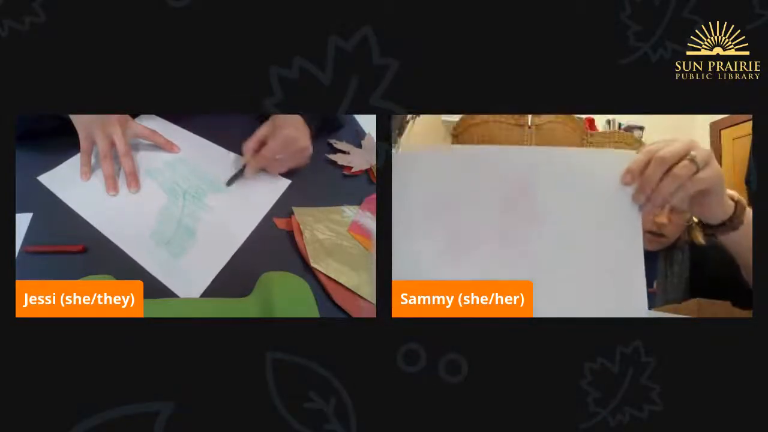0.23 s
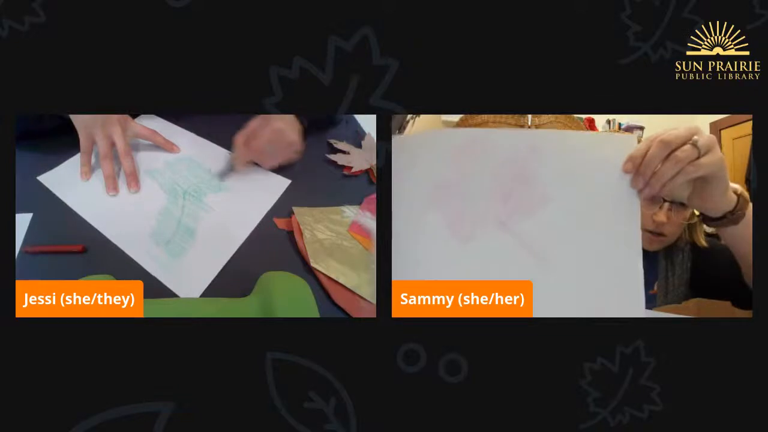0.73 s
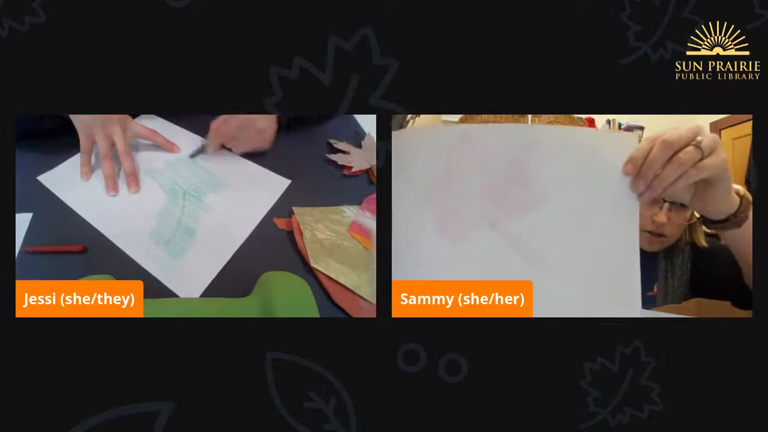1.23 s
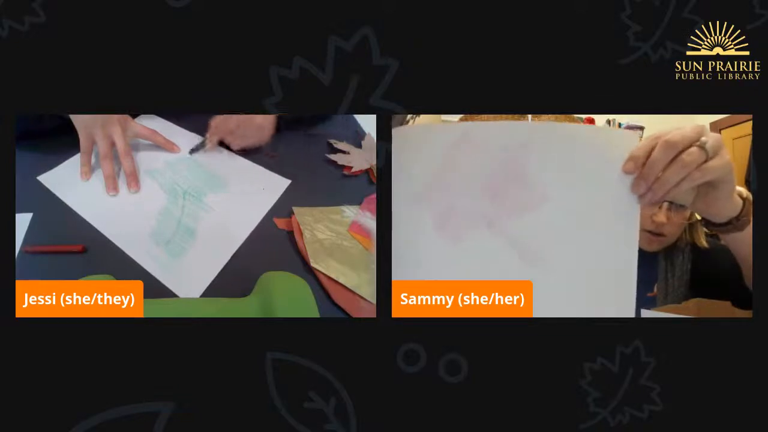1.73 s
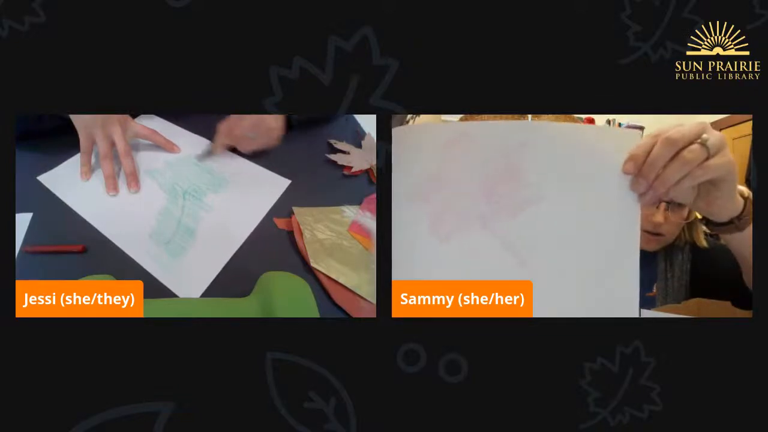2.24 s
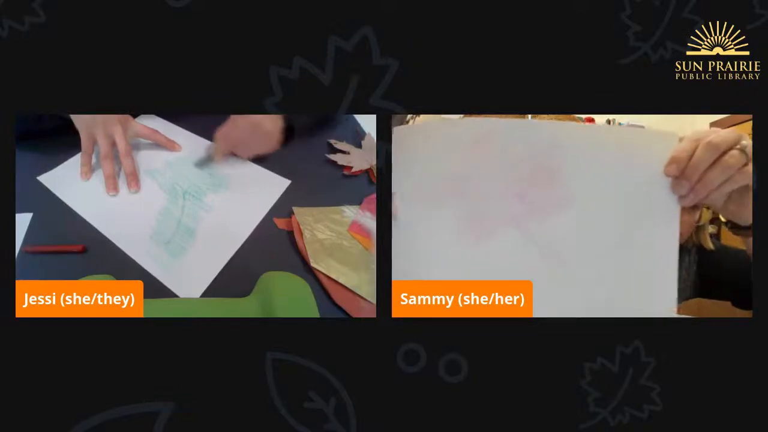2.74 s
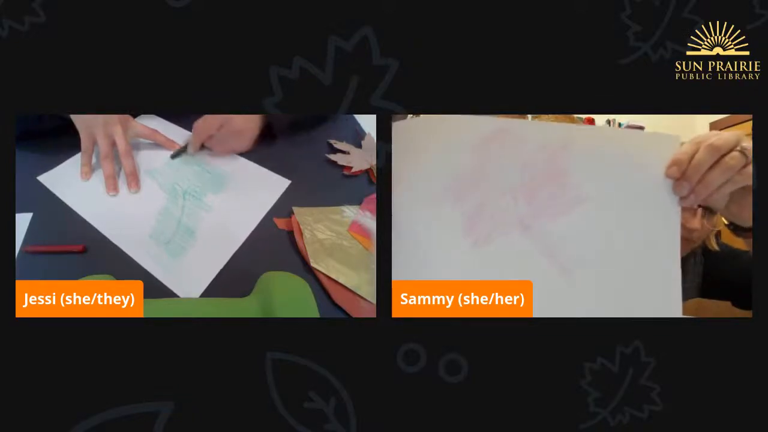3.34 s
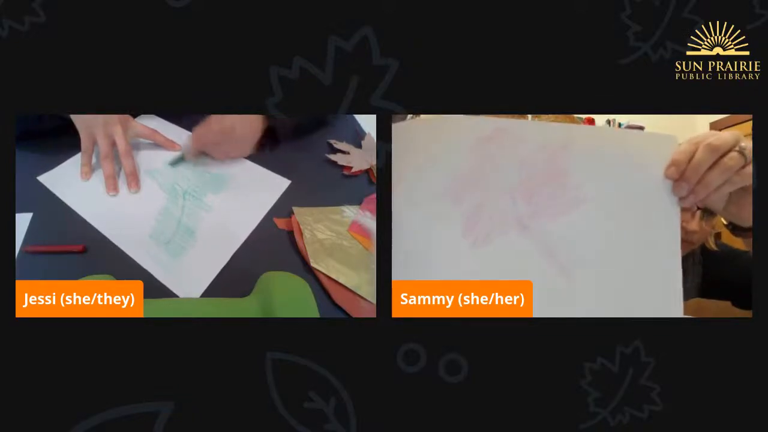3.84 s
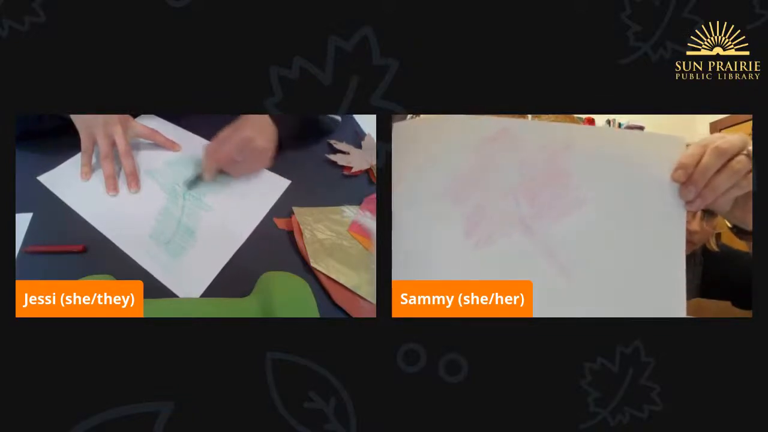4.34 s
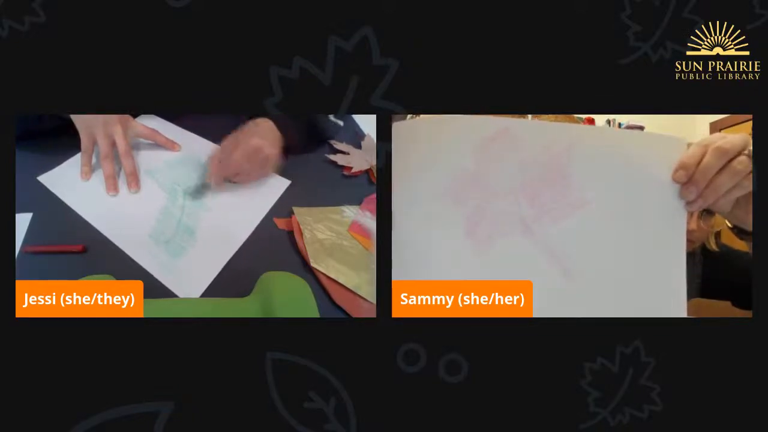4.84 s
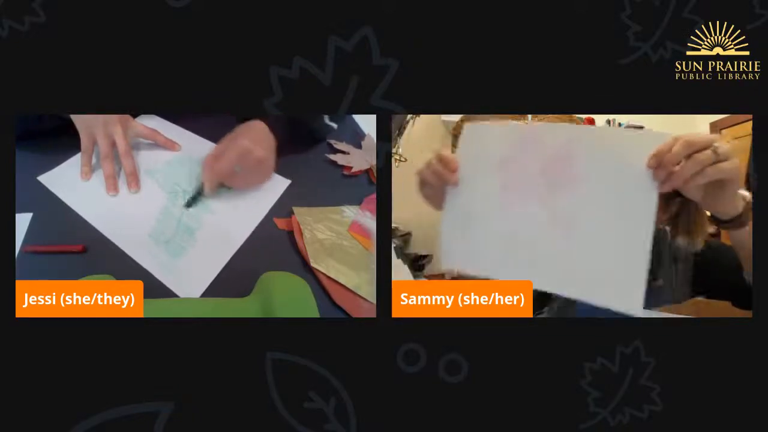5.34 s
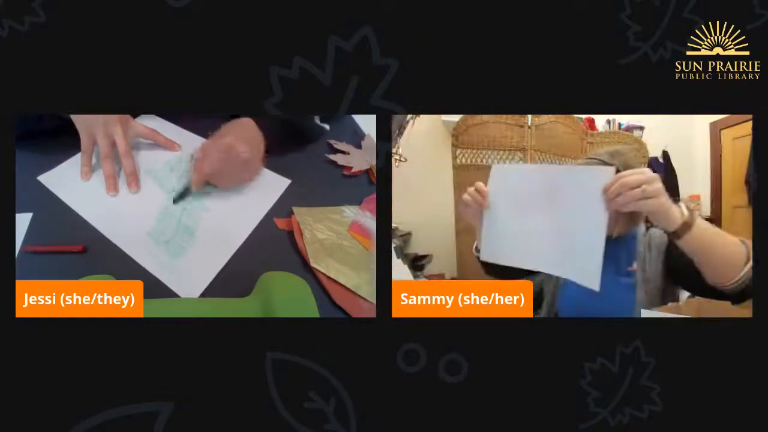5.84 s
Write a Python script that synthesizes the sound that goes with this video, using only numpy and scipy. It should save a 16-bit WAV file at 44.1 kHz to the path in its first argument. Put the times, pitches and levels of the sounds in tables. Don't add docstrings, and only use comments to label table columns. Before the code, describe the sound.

A crayon is rubbed back and forth over paper on a hard table, picked up close in a quiet, softly furnished room with faint air noise and a tiny fan whine. The strokes keep an even rhythm, a push roughly every 0.27 seconds with a lighter return between. From 0 to 2.7 seconds they are thin, airy hisses, with a soft knock at the start, a small tap near 0.27 and a clearer rap at 1.35. Around 2.9 the hand presses harder: hisses brighten, scratches grow gritty, and dull bumps gather. From 3.5 woody knocks mark the strokes, strongest around 4.2, with low table rumble and brief papery squeaks. After 5.2 the raps cluster and rattle, with crisp cracks of the sheet near 5.24 and 5.59. The hiss weakens after 5.8 as a last rap lands near 6.0 seconds.

```python
import sys
import numpy as np
from scipy import signal
from scipy.fft import rfft, irfft, next_fast_len
from scipy.io import wavfile
from scipy.ndimage import uniform_filter1d

SR = 44100
rng = np.random.default_rng(int(sys.argv[2]) if len(sys.argv) > 2 else 0)


def log_audio(samples):
    frames = np.atleast_2d(samples).T
    limited = np.clip(frames, -1, 1)
    pcm = np.round(limited * 32767).astype(np.int16)
    wavfile.write(sys.argv[1], SR, pcm)


def gain_from_db(level_db):
    decades = np.asarray(level_db, float) / 20
    return 10 ** decades


N = 268304
TIME = np.arange(N) / SR
DECAY = np.log(1000)


def coloured(x, points):
    hz, db = np.transpose(points)
    size = next_fast_len(len(x))
    f = np.arange(size // 2 + 1) * SR / size + 1
    gain = gain_from_db(np.interp(np.log(f), np.log(hz), db, -90, -90))
    y = irfft(rfft(x, size) * gain, size)[:len(x)]
    return y / np.std(y)


def walk(rate_hz):
    k = int(SR / rate_hz)
    held = np.repeat(rng.standard_normal(N // 40), k)[:N]
    return 1.3 * uniform_filter1d(uniform_filter1d(held, k), k)


def grit(scatter_db):
    return rng.standard_normal(N) * gain_from_db(scatter_db * rng.exponential(size=N))


def patchy(x, lo_hz, hi_hz, flicker_db, rate_hz):
    size = next_fast_len(N)
    f = np.arange(size // 2 + 1) * SR / size + 1
    place = 11 * np.log(f / lo_hz) / np.log(hi_hz / lo_hz)
    spectrum = rfft(x, size)
    out = 0
    for k in range(12):
        band = irfft(spectrum * np.clip(1 - abs(place - k), 0, 1), size)[:N]
        out = out + gain_from_db(flicker_db * walk(rate_hz)) * band
    return out


# f/Hz, level/(dB/Hz)
AIR_SPECTRUM = [(20, -11), (50, -14), (100, 9.5), (300, -3), (500, -12), (900, -20), (1500, -22),
                (3000, -31.5), (8000, -24.5), (16000, -25.5)]
# f/Hz, level/dB
FAN_PARTIALS = [(360.5, -76), (721, -93)]


def room():
    air = gain_from_db(-68.5 + 2 * walk(10)) * coloured(rng.standard_normal(N), AIR_SPECTRUM)
    whine = sum(gain_from_db(db + 4 + 1.5 * walk(6)) * np.sin(2 * np.pi * hz * TIME) for hz, db in FAN_PARTIALS)
    return air + whine


# t/s, length/s, early hiss/dB, late hiss/dB
PUSH_STROKES = [(0.0, 0.051, -63.5, -68), (0.219, 0.083, -72, -59.5), (0.475, 0.1, -68.5, -64),
                (0.745, 0.089, -71.5, -64), (1.019, 0.087, -72.5, -63.5), (1.293, 0.087, -70, -56),
                (1.562, 0.079, -69.5, -57), (1.828, 0.087, -63.5, -61.5), (2.098, 0.087, -62.5, -62.5),
                (2.365, 0.09, -67, -67), (2.656, 0.067, -69, -65), (2.907, 0.082, -57.5, -49),
                (3.166, 0.073, -57, -57.5), (3.431, 0.091, -57.5, -55), (3.706, 0.085, -52, -57.5),
                (3.978, 0.096, -47, -68), (4.247, 0.088, -51, -60.5), (4.525, 0.083, -51, -59.5),
                (4.795, 0.069, -55.5, -56.5), (5.065, 0.078, -47, -64.5), (5.329, 0.1, -47, -71.5),
                (5.573, 0.092, -48.5, -59), (5.829, 0.099, -66.5, -72.5)]
# t/s, early hiss/dB, late hiss/dB
PULL_STROKES = [(0.075, -75.5, -71), (0.354, -68.5, -70.5), (0.616, -71.5, -70.5), (0.876, -74, -73.5),
                (1.152, -74, -73), (1.425, -66.5, -64), (1.693, -67, -68), (1.965, -63.5, -69),
                (2.218, -73.5, -63.5), (2.496, -70, -73), (2.761, -78, -60.5), (3.017, -68.5, -66),
                (3.289, -70.5, -70), (3.558, -62, -62.5), (3.83, -62, -57.5), (4.097, -81.5, -48.5),
                (4.379, -77.5, -49.5), (4.653, -77, -48.5), (4.896, -80, -48), (5.177, -71, -60.5),
                (5.459, -59.5, -65), (5.69, -75, -58.5), (5.951, -75, -71)]
PULL_S = 0.098


def sweeps():
    rise_s, fall_s, arch_db, linger_db = 0.021, 0.016, 3.0, -27.0
    moving, speed = np.zeros(N), np.zeros(N)
    pulls = [(s, PULL_S, early, late) for s, early, late in PULL_STROKES]
    for start, length, early_db, late_db in PUSH_STROKES + pulls:
        near = slice(max(int((start - 0.1) * SR), 0), int((start + length + 0.1) * SR))
        since = TIME[near] - start
        gate = 1 / (1 + np.exp(-4 * since / rise_s)) / (1 + np.exp(4 * (since - length) / fall_s))
        gate += gain_from_db(linger_db) * np.exp(-((since - length / 2) / (0.75 * length)) ** 4)
        part = np.clip(since / length, 0, 1)
        arch = arch_db * (np.sin(np.pi * part) - 2.5)
        moving[near] += gate
        speed[near] += gate * gain_from_db(early_db + (late_db - early_db) * part + arch)
    return moving, speed


# t/s, pressure/dB, surface coarseness/dB
HAND_PATH = [(0, -13, -10), (.6, -15, -7), (1.2, -16, -9), (1.42, -3.5, -6.5), (1.75, -17, -11),
             (2.5, -19, -13), (2.8, -11, -13), (3.0, -6, -12), (3.2, -5, -4.5), (3.7, -1, -5.5),
             (3.9, -4.5, -2.5), (4.501, -0.5, -5.5), (5.0, 0, -2.5), (5.5, -2.5, -1), (6.08, -8, 1.5)]


def hand():
    s, *columns = np.transpose(HAND_PATH)
    return [np.interp(TIME, s, c) for c in columns]


PUSH_TOOTH = [0.1, 0.1, 0.1, 0.1, 0.1, 0.1, 0.1, 0.1, 0.1, 0.1, -6, -3, -4, 0.1, 0.1, 0.1, 0.1, 0.1, 0.1,
              0.1, 0.1, 0.1, 0.1]
PULL_TOOTH = [0.1, 0.1, 0.1, 0.1, 0.1, -2, 0.1, -2, 0.1, 0.1, 0.1, 0.1, 3, 0.1, 0.1, 0.1, 0.1, 0.1, 0.1,
              0.1, 0.1, 0.1, 0.1]


def tooth():
    middles = np.array([row[0] + 0.045 for row in PUSH_STROKES + PULL_STROKES])
    order = np.argsort(middles)
    return np.interp(TIME, middles[order], np.array(PUSH_TOOTH + PULL_TOOTH)[order])


# f/Hz, width/Hz, level against scratch/dB
SHEET_MODES = [(2220, 200, -13), (2600, 200, -14), (3400, 240, -14), (3950, 240, -13), (4650, 280, -12),
               (5300, 280, -12), (6200, 320, -10), (7100, 320, -13)]
# t/s, index into SHEET_MODES
SQUEAK_TIMES = [(1.35, 3), (.40, 0), (.49, 0), (.79, 0), (1.2, 0), (1.61, 0), (2.95, 6), (3.18, 1),
                (3.32, 5), (3.32, 1), (3.385, 1), (3.35, 3), (3.62, 3), (3.98, 2), (3.995, 4), (4.25, 4),
                (4.28, 6), (4.41, 4), (5.2, 4), (5.73, 4), (5.87, 4), (5.87, 2), (5.92, 2), (6.03, 4),
                (3.645, 3), (3.37, 3), (5.59, 6), (5.63, 6), (5.34, 4)]


def sheet(rub):
    squeak_db, squeak_s = 1.5, 0.026
    out, t = 0, np.arange(0, N / SR + 0.002, 0.002)
    for k, (hz, width_hz, db) in enumerate(SHEET_MODES):
        flare = np.zeros(len(t))
        for s, which in SQUEAK_TIMES:
            if which == k:
                flare += gain_from_db(squeak_db) * np.exp(-((t - s) / squeak_s) ** 2)
        peak = signal.iirpeak(hz, hz / (1.7 * width_hz), fs=SR)
        rung = signal.lfilter(*peak, signal.lfilter(*peak, rub))
        gain = gain_from_db(db + 3.9 * walk(24)) + np.interp(TIME, t, flare)
        out = out + gain * rung / np.std(rung)
    return out


# f/Hz, level/(dB/Hz)
HISS_SPECTRUM = [(5000, -30), (7800, -9), (8100, 0), (9300, 1), (11800, -5), (12300, -2), (15500, -3),
                 (16000, -12)]
# f/Hz, level/(dB/Hz)
SCRATCH_SPECTRUM = [(700, -18), (1500, -2), (2300, 1), (3500, 0), (4700, 1), (6300, -1), (7800, -3),
                    (8300, -25)]


def strokes(speed):
    hiss = gain_from_db(2.2 * walk(50)) * patchy(coloured(grit(1.5), HISS_SPECTRUM), 5000, 16000, 2.6, 40)
    rub = coloured(grit(1.8), SCRATCH_SPECTRUM)
    scratch = gain_from_db(1.4 * walk(45)) * patchy(rub, 1000, 8400, 4.4, 34)
    coarse = gain_from_db(hand()[1] + tooth())
    return speed * (gain_from_db(3) * hiss + coarse * (gain_from_db(7) * scratch + sheet(rub)))


def ring(modes, t, scatter_db, detune):
    hz, db, t60 = np.transpose(modes)[:, :, None]
    chance = rng.standard_normal((2, len(modes), 1))
    swell = np.clip(t * hz / 0.56, 0, 1) ** 2 * np.exp(-DECAY * t / t60)
    side = (-1.) ** np.arange(len(modes))[:, None]
    tones = np.sin(2 * np.pi * hz * (1 + detune * chance[1]) * t)
    return (side * gain_from_db(db + scatter_db * chance[0]) * swell * tones).sum(0)


def driven(modes, t, push, spread_ms=0, at_hz=1000, less=0):
    ragged_db, lag_law = 2.6, 2.5
    out = 0
    for (hz, db, t60), chance in zip(modes, rng.standard_normal((len(modes), 3))):
        lag_s = spread_ms / 1000 * max((at_hz / hz) ** lag_law - less, 0)
        power = np.interp(t - lag_s, t, push, 0) ** 2
        fill = signal.lfilter([1], [1, -np.exp(-2 * DECAY / (t60 * SR))], power)
        tone = np.sin(2 * np.pi * (hz * (1 + 0.012 * chance[1]) * t + chance[2]))
        out = out + gain_from_db(db + 1.5 * chance[0]) * np.sqrt(fill) * tone
    steps = np.repeat(rng.standard_normal(len(t) // 110 + 1), 110)[:len(t)]
    return out * gain_from_db(ragged_db * uniform_filter1d(steps, size=70))


# t/s, peak/dB, thud against peak/dB, contact/ms, brightness/(dB/octave)
ROUND_KNOCKS = [(0.014, -40.5, -9, 4.2, -8), (0.52, -59.5, 0, 5.6, -7), (1.058, -56, -8.5, 5.7, -3),
                (2.963, -35, -18, 3.9, 2), (3.203, -47, -9, 4.8, 2), (3.221, -50.5, 4, 1.9, 0.1),
                (3.485, -42, -22, 2.6, 0.1), (3.843, -36.5, -8, 3.7, -3), (3.977, -40, -8, 4.7, -4),
                (3.993, -26.5, -5.5, 2.9, 8.5), (4.036, -30, -5.5, 3, 3), (4.262, -20.5, -28, 2.1, 0),
                (4.528, -32.5, -14, 3.23, -3), (4.537, -30, -6.5, 2.67, -2), (4.575, -30.5, -7.5, 2.7, -1),
                (4.806, -30, -4.5, 5.2, -3), (5.053, -41.5, -1.5, 5.5, -5), (5.071, -30, -10.5, 4.8, -4),
                (5.604, -37.5, -6, 3.7, 6), (5.618, -33, -1.5, 5.2, -11), (5.865, -38, -14, 2.2, 9),
                (5.879, -43, -6, 3, 3), (5.636, -40, -5.5, 3.9, -9), (5.545, -42, -7, 2.6, 6),
                (5.512, -33.5, -8, 4, -2), (5.481, -37, -8, 2.2, 2), (4.188, -28.5, -2.5, 4, -9),
                (0.03, -45.5, -2, 3.6, -11), (2.685, -54.5, 0, 3.7, -5), (2.975, -43, 0.5, 6, -4),
                (2.925, -52, -10, 6, 5), (1.356, -42, -8, 5, 0.1)]
# t/s, thud/dB, weight of lowest table modes/dB
DULL_BUMPS = [(0.53, -49.5, 2), (0.051, -56.5, 20), (1.549, -63, 23), (1.574, -74, 22), (1.621, -59, 27),
              (2.19, -59.5, 20), (2.885, -51, 8), (2.921, -49.5, -3), (3.089, -47.5, -4), (3.169, -50, 20),
              (3.336, -46, 11), (3.436, -72, -3), (5.078, -47, 17), (5.384, -39.5, -19.5), (5.457, -62, 5),
              (5.733, -44, -26), (1.599, -57, 21), (2.036, -60, 27), (2.221, -70, 21), (2.677, -44.5, 10),
              (2.798, -59, -10), (3.05, -44, 4), (3.311, -42, 1), (3.574, -41, -21), (3.844, -32, -1),
              (3.865, -34.5, 7), (4.118, -30.5, -8), (4.142, -32.5, -10), (4.307, -34.5, -12),
              (4.394, -31, -36), (4.666, -33, -6), (4.911, -39, -20), (5.249, -38.5, 36), (5.468, -47, -12),
              (5.722, -51, -10), (5.879, -42.5, -10), (5.986, -43, -24)]
# thud/dB, tick/dB, paper snap/dB
RIDGE_RAPS = [(0.267, -43, -12.5, -10.5, -45), (1.344, -33, -14, -14, -27), (3.491, -25.5, -6, -14.5, -29),
              (3.709, -45, -19, -13.5, -21), (3.761, -23, -9.5, -10, -22), (3.895, -24.5, -5.5, -11.5, -22),
              (4.17, -16, -2, -18.5, -28), (4.449, -25.5, -2, -18.5, -28),
              (4.728, -27.5, -1.5, -17.5, -12.5), (4.959, -22.5, -2, -16.5, -18.5),
              (5.236, -29, -12.5, -9.5, -4), (5.338, -37, -7.5, -12.5, 0), (5.485, -19, -3.5, -10.5, -54),
              (5.531, -25, -8, -5, -8.5), (5.583, -38.5, -32, 0.5, 7), (5.592, -28.5, -13, -14, -5.5),
              (5.745, -18, -6.5, -8, -38), (5.998, -29.5, -3.5, -3.5, -59)]
# brightness/(dB/octave), lag of a 1 kHz mode/ms, contact/ms
RAP_LANDINGS = [(8, 1.5, 3.6), (1.5, 1.8, 4.6), (-2.5, 1.9, 4), (2, 1.1, 4.5), (-0.5, 2.5, 3.6),
                (-8, 2, 3.4), (-2, 0.49, 3.8), (3, 0.68, 4.5), (4, 0.51, 4), (-5, 1, 5.4), (9, 2.7, 4.4),
                (4, 3.7, 5.3), (1.5, 4.6, 4.6), (6, 0.6, 4.2), (3, 1.3, 2.7), (8, 1, 2.1), (4.5, 5.7, 3.5),
                (0.1, 5.9, 3.7)]
LOW_DB = -5.1


def blows():
    spread_ms, bump_knock_db = 0.68, -12.5
    out = []
    for (s, db, thud, tick, snap), (bright, lag_ms, ms) in zip(RIDGE_RAPS, RAP_LANDINGS):
        out.append((s, db, thud, LOW_DB, tick, snap, ms, bright, lag_ms))
    for s, db, thud, ms, bright in ROUND_KNOCKS:
        out.append((s, db, thud, LOW_DB, -23.5, -27, ms, bright, spread_ms))
    for s, thud_db, low in DULL_BUMPS:
        tick, snap = -44 - bump_knock_db, -34.5 - bump_knock_db
        out.append((s, thud_db + bump_knock_db, -bump_knock_db, low, tick, snap, 3.2, 0, spread_ms))
    return out


# f/Hz, level/dB, t60/s
TABLE_THUD = [(182, -13.5, 0.023), (217.3, -8.5, 0.1), (288.8, -5.5, 0.11), (364.8, -7, 0.27),
              (436.6, -15, 0.14), (489.4, 1, 0.043), (534, 5.5, 0.032), (614.6, -8, 0.05)]
# f/Hz, level/dB, t60/s
TABLE_KNOCK = [(698, -8, 0.045), (790, -5.5, 0.043), (870.8, 2.5, 0.025), (960, -4, 0.031),
               (1040, -0.5, 0.025), (1178.5, -4.5, 0.028), (1308, -9, 0.024), (1444, -5, 0.021),
               (1561, -10, 0.018), (1862, -12.5, 0.015)]
# f/Hz, level/dB, t60/s
TABLE_TICK = [(1646, -3.5, 0.0071), (1794, -1.5, 0.003), (2057, -3, 0.0045), (2216, -1, 0.0045),
              (2703, -6.5, 0.0047), (2944, -10.5, 0.0078), (3310, -12.5, 0.0061), (3710, -4.5, 0.0034),
              (4800, -15, 0.0023)]
# f/Hz, level/(dB/Hz)
SNAP_SPECTRUM = [(3000, 18), (4600, 26.8), (6200, 31.2), (8000, 18.2), (11000, 14.3), (15500, 1)]


def knocks():
    thud_gain_db, knock_gain_db, tick_gain_db, echo_db, echo_t60_s = 2.5, 1.0, 10.0, -11.5, 0.17
    thud_late_ms, knock_late_ms, low_lag_ms = 2.34, 2.48, 5
    out, t = np.zeros(N + SR), np.arange(int(0.16 * SR)) / SR
    after = np.arange(int(0.25 * SR)) / SR
    fade = np.exp(-DECAY * after / echo_t60_s) * np.clip(after / 0.0038, 0, 1)

    def late(ms):
        return 1 - np.exp(-(t * 1000 / ms) ** 2.2)

    for s, peak_db, thud, low, tick, snap, contact_ms, bright, lag_ms in blows():
        x = t * 1000 / max(contact_ms, 0.5)

        def push(haste):
            return np.exp(-(0.5 * x * haste) ** 2) + 0.27 * np.exp(-0.25 * x)

        tilt = np.interp(s, *np.transpose(HAND_PATH)[:2])
        thud_modes = [(hz, db + low * (hz < 400), t60) for hz, db, t60 in TABLE_THUD]
        knock_modes = [(hz, db + tilt * abs(np.log2(hz / 1300)) + bright * np.log2(hz / 1000), t60)
                       for hz, db, t60 in TABLE_KNOCK]
        tick_modes = [(hz, db + tilt * abs(np.log2(hz / 1300)), t60) for hz, db, t60 in TABLE_TICK]

        rattle = rng.standard_normal(len(t)) * (rng.random(len(t)) < 0.3)
        rattle *= push(1.5) * late(2.2) * 0.22
        rattle[70] += 1.4
        low_lag = low_lag_ms if low == LOW_DB else 0
        thud_part = driven(thud_modes, t, push(0.93) * late(thud_late_ms), low_lag, 480, 1)
        knock_part = driven(knock_modes, t, push(0.96) * late(knock_late_ms), max(lag_ms, 0))
        tick_part = signal.fftconvolve(rattle, ring(tick_modes, t, 1.5, 0.03))[:len(t)]
        hit = 0
        for part, db in ((thud_part, thud + thud_gain_db), (knock_part, knock_gain_db),
                         (tick_part, tick + tick_gain_db)):
            loudest = np.sqrt(uniform_filter1d(part ** 2, size=260).max())
            hit = hit + gain_from_db(db) * part / (2 * loudest)
        crumple = (1 - np.exp(-(3 * x) ** 2)) * (np.exp(-(0.5 * x) ** 2) + 0.27 * np.exp(-0.3 * x))
        paper = gain_from_db(snap) * coloured(rng.standard_normal(len(t)), SNAP_SPECTRUM) * crumple
        hit = gain_from_db(peak_db) * (hit + paper)

        bright_noise, dull_noise = rng.standard_normal((2, len(after)))
        tail = signal.lfilter([0.16], [1, -0.84], dull_noise) * fade + 0.49 * bright_noise * fade ** 1.4
        echo = gain_from_db(echo_db) * signal.fftconvolve(hit, tail / np.linalg.norm(tail))
        i = max(int(s * SR) - 90, 0)
        out[i:i + len(t)] += hit
        out[i:i + len(echo)] += echo
    return signal.sosfilt(signal.butter(2, 130, "high", fs=SR, output="sos"), out[:N])


def skipping():
    chatter_db, chatter_s = -26, 0.034
    kicks = np.zeros(N)
    for s, peak_db, *_ in blows():
        kicks[int(s * SR)] += gain_from_db(peak_db + chatter_db)
    return signal.lfilter([1], [1, -np.exp(-1 / (chatter_s * SR))], kicks)


# t/s, level/dB, f/Hz, time to rise or fall 30 dB/ms
TABLE_SHOVES = [(0.23, -58, 107, 60), (0.489, -42.5, 107.3, 71), (1.082, -61, 106, 121),
                (1.109, -48, 106.7, 22), (1.312, -38, 107.3, 65), (1.439, -42.5, 109.5, 80),
                (1.587, -54, 111, 99), (1.616, -54, 102.8, 122), (2.197, -48.5, 106, 34),
                (2.529, -55, 116, 24), (2.858, -54, 110.4, 85), (2.994, -44.5, 103.3, 112),
                (3.212, -48.5, 102.7, 28), (3.393, -56, 102.8, 54), (3.649, -52, 108.3, 50),
                (3.792, -54.5, 113.3, 51), (4.041, -57.5, 117.1, 80), (4.206, -50.5, 111.6, 38),
                (4.301, -53, 113.2, 27), (4.372, -49.5, 116.3, 57), (4.602, -42.5, 114.8, 41),
                (4.773, -61, 113.4, 67), (4.861, -49, 109.3, 41), (5.012, -39.5, 109.3, 51),
                (5.137, -37.5, 104.4, 71), (5.165, -62, 116.3, 111), (5.288, -49, 103.5, 23),
                (5.401, -36, 109.1, 57), (5.638, -37.5, 107, 92), (6.045, -53.5, 108, 63)]


def rocking():
    idle_db, roundness = -75, 1.35
    t = np.arange(0, N / SR + 0.002, 0.002)
    s, db, pitch_hz, spread_ms = np.transpose(TABLE_SHOVES)[:, :, None]
    away = abs((t - s) / (np.maximum(spread_ms, 30) / 1000))
    swell = gain_from_db(db - 30 * away ** roundness).sum(0) + gain_from_db(idle_db)
    return np.interp(TIME, s[:, 0], pitch_hz[:, 0]), np.interp(TIME, t, swell)


# f/Hz, level/(dB/Hz)
RUMBLE_SPECTRUM = [(90, -10), (140, -8.5), (220, 0), (300, -9), (450, -11), (900, -22), (1500, -45)]


def shudder(moving):
    drag_db, drag_slope = -55.5, 0.91
    body_db, body_slope, body_tilt_db = -60.5, 1.95, -1.5
    hz, strength = rocking()
    press_db = hand()[0]
    motion = gain_from_db(-5.5) + moving
    rock = np.sqrt(2) * np.sin(2 * np.pi * np.cumsum(hz * (1 + 0.017 * walk(24.4))) / SR)
    sway = coloured(rng.standard_normal(N),
                    [(15, -28), (40, -8), (70, -21), (140, -2), (200, -8), (260, -17.5)])
    rocked = strength * (rock * gain_from_db(1.3 * walk(35)) + gain_from_db(-9) * sway)
    drag = gain_from_db(3.2 * walk(30)) * coloured(grit(1.2), RUMBLE_SPECTRUM)
    dragged = motion * gain_from_db(drag_db + drag_slope * press_db) * drag
    modes = [(f, db + body_tilt_db * np.log2(f / 700), t60)
             for f, db, t60 in TABLE_THUD[2:] + TABLE_KNOCK + TABLE_TICK[:5]]
    t = np.arange(int(0.1 * SR)) / SR
    body = signal.fftconvolve(grit(2) * gain_from_db(4.5 * walk(55)), ring(modes, t, 0.1, 0.001))[:N]
    body_gain = motion * gain_from_db(body_db + body_slope * press_db) + skipping()
    return rocked + dragged + body_gain * body / np.std(body)


# t/s, peak/dB, length/ms
SHEET_CRACKS = [
    (5.2385, -30.5, 2.2),
    (5.252, -42, 5.1),
    (5.331, -56, 3.71),
    (5.346, -39, 2.2),
    (5.534, -37.5, 5.5),
    (5.5917, -25.5, 2.2),
    (3.763, -45, 2.8),
    (1.346, -59, 2.4),
    (4.731, -39, 2.86),
    (4.8, -41, 2.7),
]
# f/Hz, level/(dB/Hz)
CRACK_SPECTRUM = [(1500, -14), (3000, -8), (4600, -5), (6200, 0.5), (8000, -6), (11000, -8), (15500, -18)]


def cracks():
    out, t = np.zeros(N), np.arange(int(0.04 * SR)) / SR
    for s, peak_db, ms in SHEET_CRACKS:
        x = t * 1000 / max(ms, 0.5)
        burst = coloured(rng.standard_normal(len(t)), CRACK_SPECTRUM)
        i = int(s * SR)
        out[i:i + len(t)] += gain_from_db(peak_db) * burst * np.clip(4 * x, 0, 1) * np.exp(-x ** 2)
    return out


def scene():
    moving, speed = sweeps()
    return (room() + strokes(speed) + knocks() + shudder(moving) + cracks())[None]


def band_limit(x):
    return signal.sosfilt(signal.butter(12, 15700, fs=SR, output="sos"), x)


def record(dry):
    mix = signal.sosfilt(signal.butter(6, 16000, fs=SR, output="sos"), dry)
    return band_limit(mix)


dry = scene()
out = record(dry)
log_audio(out)
```